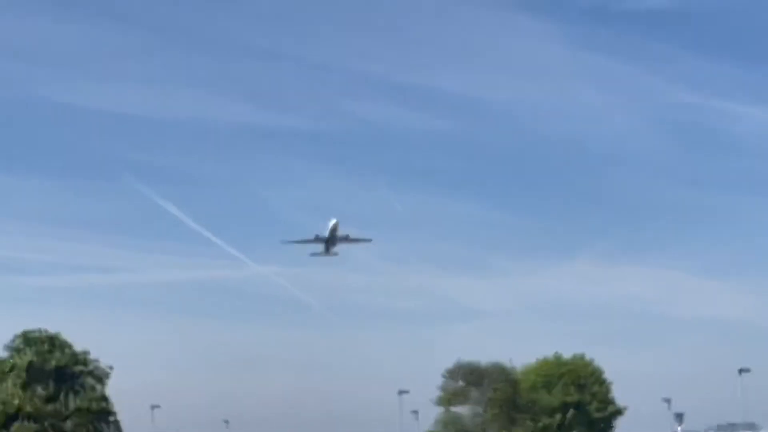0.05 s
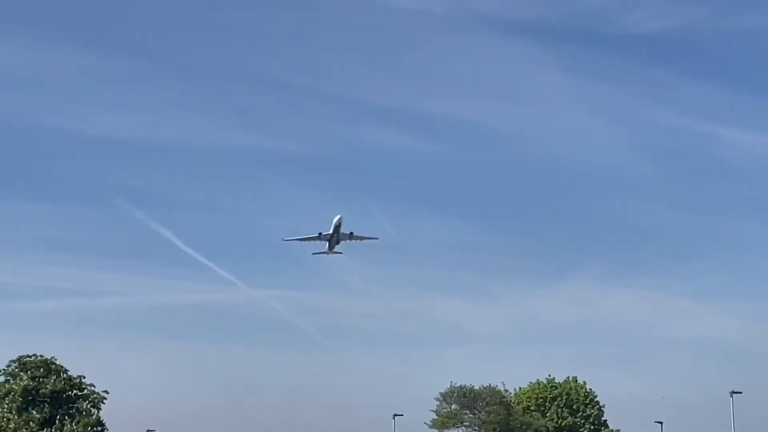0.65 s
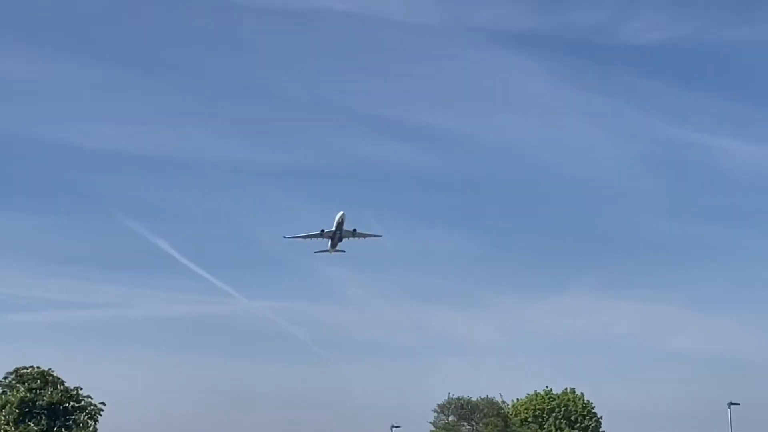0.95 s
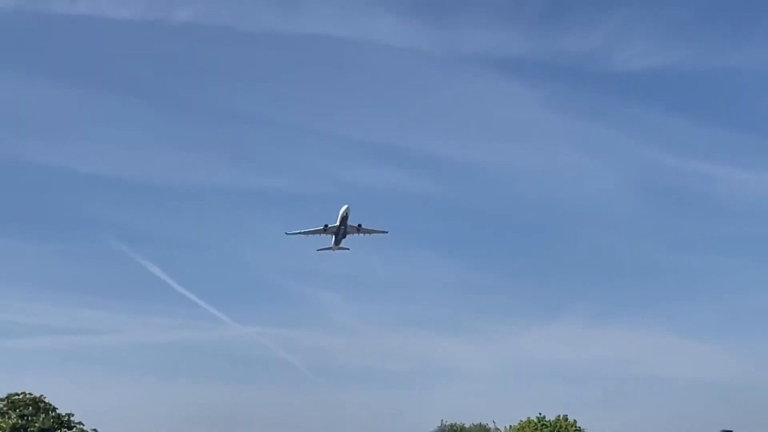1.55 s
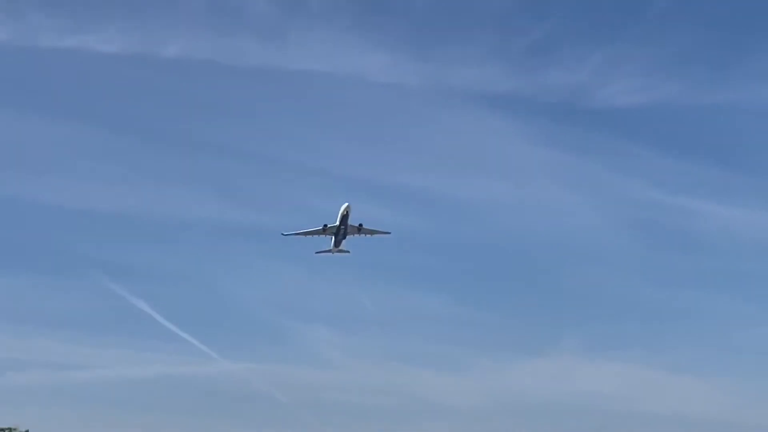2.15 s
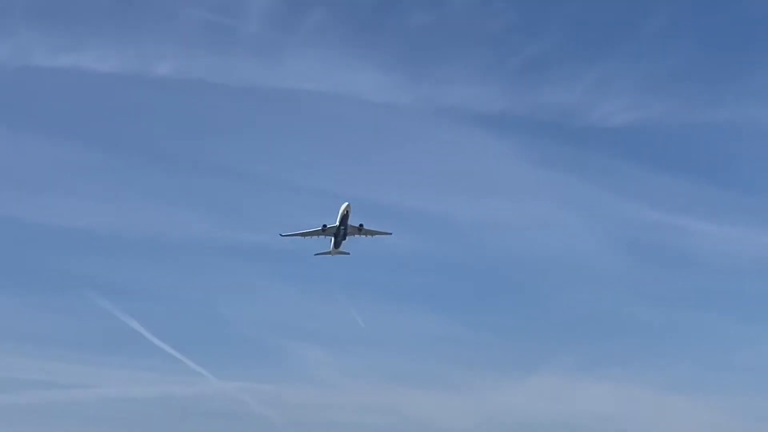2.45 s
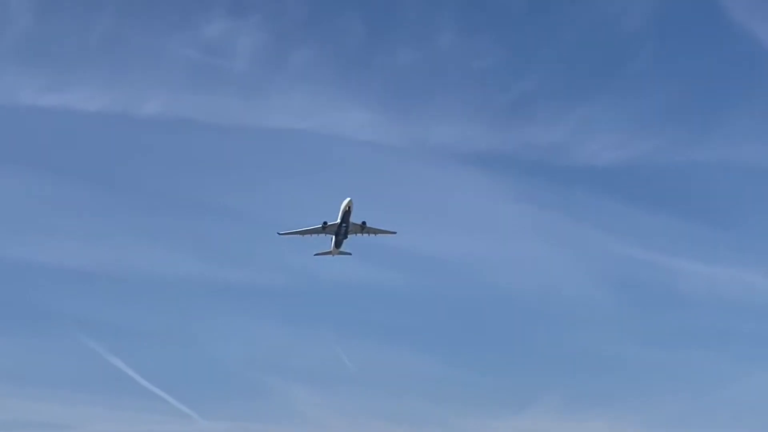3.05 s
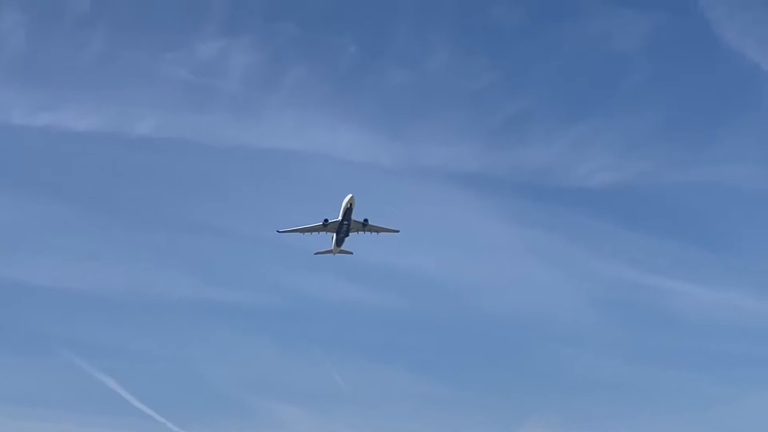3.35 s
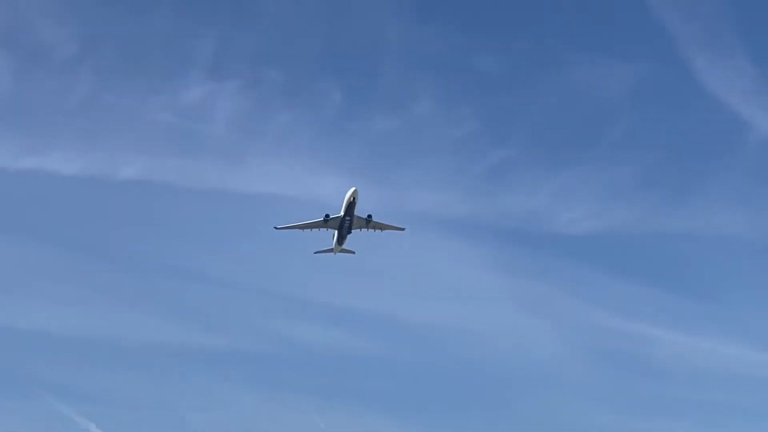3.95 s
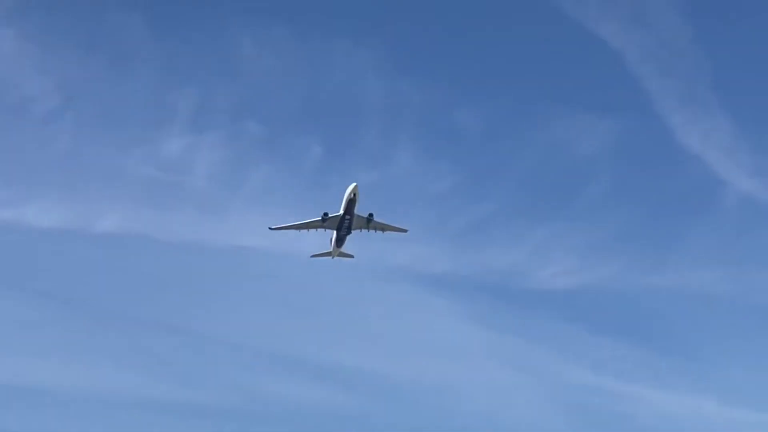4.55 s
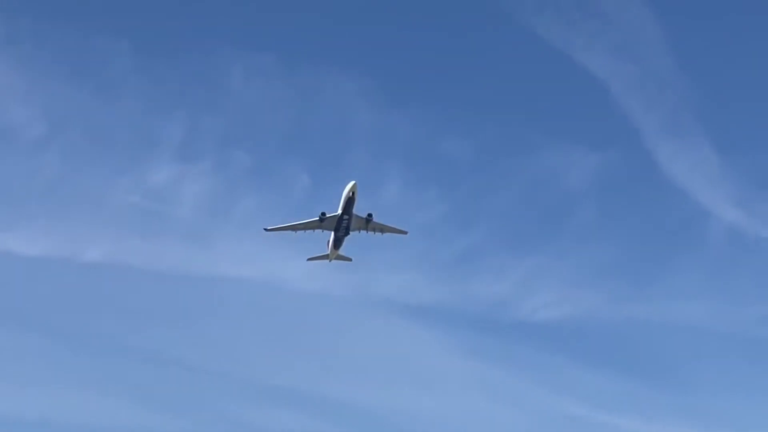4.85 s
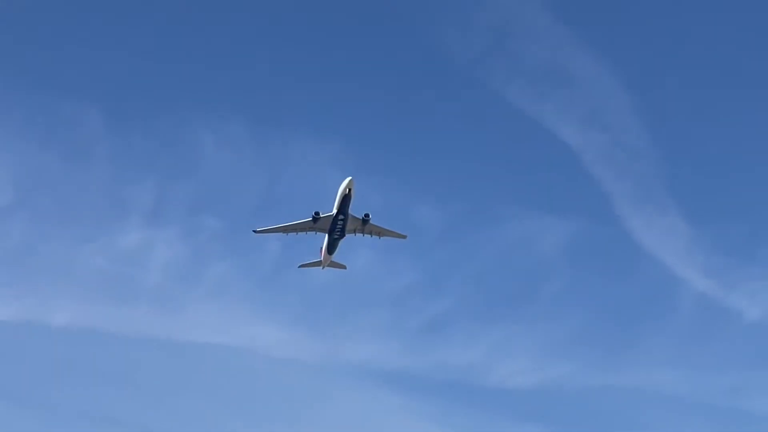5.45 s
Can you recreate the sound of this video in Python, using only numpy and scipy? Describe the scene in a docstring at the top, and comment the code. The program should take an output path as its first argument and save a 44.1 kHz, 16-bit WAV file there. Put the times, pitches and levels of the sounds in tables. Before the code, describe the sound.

A twin-engine airliner climbs towards the listener at takeoff power. Its roar and deep rumble swell and fade unevenly, growing louder just past halfway. A high, flickering fan whine sinks slightly in pitch over hiss and a faint buzz. The stereo microphone stands on open grass, where a light breeze thumps against it and a few soft rustles sound close by, mostly early on.

```python
"""A twin-engine airliner at takeoff power, climbing out towards a stereo microphone on open grass.
Its jets rumble and roar; its fans whine at their blade rate over faint buzz-saw tones on the shaft
orders, the pitch sinking as the approach slows. Turbulent air on the way makes the sound swell and
fade, and the echo off the ground sweeps a comb down through the roar. Close by are a few soft rustles
and a light breeze that buffets the microphone, mostly in the first three seconds."""
import sys
import numpy as np
from scipy import signal
from scipy.fft import rfft, irfft
from scipy.io import wavfile
from scipy.ndimage import uniform_filter1d

SR = 44100
rng = np.random.default_rng(int(sys.argv[2]) if len(sys.argv) > 2 else 0)


def log_audio(samples):
    """Write samples as a 16-bit WAV file to the path given in sys.argv[1]."""
    # one column per channel
    frames = np.atleast_2d(samples).T
    # limit to full scale, then quantise
    limited = np.clip(frames, -1, 1)
    pcm = np.round(limited * 32767).astype(np.int16)
    wavfile.write(sys.argv[1], SR, pcm)


N = 242550
TIME = np.arange(N) / SR


# jet noise reaching the microphone through turbulent air: (time [s], roar [dB], rasp [dB])
JET_LEVELS = [(0.0, -31, -35.5), (0.09, -35, -38), (1.33, -28.5, -28), (1.41, -25.5, -24.5),
              (1.7, -24.5, -27.5), (1.96, -28, -28.5), (2.59, -29.5, -34), (2.76, -30.5, -30.5),
              (2.9, -24.5, -29.5), (3.14, -16, -20), (3.45, -22.5, -24), (3.72, -26.5, -29.5),
              (3.92, -22, -23), (4.15, -25, -26), (4.46, -21, -28), (4.66, -23, -24), (4.93, -27, -28.5),
              (5.3, -27.5, -25.5), (5.5, -30.5, -26)]
# spectra of the roar and of the rasp above it: (frequency [Hz], level [dB])
ROAR_SPECTRUM = [(230, -27), (400, 5), (550, 3), (680, 3.5), (820, 0.5), (980, -9.5), (1400, -33)]
RASP_SPECTRUM = [(550, -30.5), (830, -0.5), (1000, 3), (1200, 1.5), (1500, -1), (1750, -5), (1900, -12),
                 (2080, -17), (2250, -18.5), (2450, -18.5), (3200, -32.5), (4500, -62)]

def jet_roar(roar_trim_db=-0.65, rasp_trim_db=-0.53):
    """Small eddies in the plume roar; the smallest, nearest the nozzles, rasp."""
    roar_db, rasp_db = in_time(JET_LEVELS)
    flutter_db = 0.18 * drift(23)
    roar = steadied(over_ground(noise(ROAR_SPECTRUM)), span_s=0.23)
    rasp = steadied(over_ground(noise(RASP_SPECTRUM)), span_s=0.65)
    roar *= from_db(roar_db + roar_trim_db + flutter_db)
    rasp *= from_db(rasp_db + rasp_trim_db + flutter_db)
    return roar + rasp


def roar_swing_db():
    """How far the roar stands above or below its mean level."""
    roar_db = in_time(JET_LEVELS)[0]
    return roar_db - roar_db.mean()


# spectrum of the deep rumble: (frequency [Hz], level [dB])
RUMBLE_SPECTRUM = [(20, -41.5), (31, -23.5), (42, -16), (57, -0.5), (68, -2.5), (81, 1), (105, -5.5),
                   (135, -8), (190, -29.5), (350, -20)]
# its surges and lulls: (time [s], level change [dB])
RUMBLE_SURGES = [(.06, -0.5), (0.132, 0), (.37, -3), (.51, 4.5), (.59, -4), (0.769, 6), (.84, -2),
                 (1.019, 5.5), (1.12, -15), (1.44, 4), (1.67, 3), (1.73, -9), (2.13, -18), (2.53, -7),
                 (2.66, 4), (2.93, 4.5), (3.0, -3), (3.065, 10), (3.15, -1.5), (3.28, 5), (3.39, 4.5),
                 (4.24, -25), (4.55, 4), (5.08, 3), (5.43, 4)]

def jet_rumble(far_db=-21, near_db=-20, surge_s=0.017):
    """The largest eddies, far down the plume, rumble in surges."""
    surge_db = sum(db * bell(s, surge_s) for s, db in RUMBLE_SURGES)
    level_db = on_approach(far_db, near_db) + 0.26 * roar_swing_db() + surge_db + 0.5 * drift(6.6)
    return from_db(level_db) * steadied(over_ground(noise(RUMBLE_SPECTRUM)), span_s=0.037)


# spectrum of the plume between rumble and roar: (frequency [Hz], level [dB])
BODY_SPECTRUM = [(90, -14), (135, -7), (175, -2), (215, -1.5), (280, 0), (350, -0.5), (430, -12),
                 (650, -31)]

def jet_body(far_db=-27.5, near_db=-19.5):
    """Mid-sized eddies fill out the roar as the aircraft closes on the microphone."""
    level_db = on_approach(far_db, near_db) + 0.59 * roar_swing_db() + 0.92 * drift(6.7)
    plume = approaching(noise(BODY_SPECTRUM), far_edge_hz=408)
    # long waves sink into the soft soil, so their echo comes back later
    return from_db(level_db) * steadied(over_ground(plume, soil_ms=0.27), span_s=0.13)


# bands of the roar that well up: (time [s], width [s], centre [Hz], level [dB])
ROAR_SWELLS = [(.76, 0.098, 1450, -38.5), (1.332, 0.11, 306, -29), (3.13, 0.14, 524, -25),
               (3.65, 0.12, 241, -24.5), (4.217, 0.22, 886, -28)]
# shape of one band, from lower skirt to upper skirt: (level [dB])
SWELL_BAND = (-25.5, -6, 0, -7.5, -27)

def roar_swells(skirt_octaves=0.6):
    """Bands of the roar swell briefly and fade."""
    ratios = 2 ** (skirt_octaves * np.array([-1, -0.5, 0, 0.64, 0.96]))
    return sum(from_db(db) * bell(s, width) * noise(list(zip(hz * ratios, SWELL_BAND)))
               for s, width, hz, db in ROAR_SWELLS)


# fan pitch as heard from the ground, its Doppler shift shrinking: (time [s], blade rate [Hz])
BLADE_RATE = [(0, 2336), (1.3, 2332), (2.1, 2322), (2.7, 2330), (3.0, 2320), (3.8, 2314), (4.2, 2303),
              (4.75, 2300), (5.5, 2281)]
BLADES = 34

def shaft_angle(waver_hz=1.51):
    """The fan's turning as heard from afar; eddies stretch and squeeze the path, so the pitch wavers."""
    blade_hz = in_time(BLADE_RATE)[0] + waver_hz * drift(4.88)
    return 2 * np.pi * np.cumsum(blade_hz) / SR / BLADES


# moments when eddies focus the whine on the microphone: (time [s], width [s], level [dB])
WHINE_PEAKS = [(.7, .017, -39.5), (.775, .022, -43), (.92, .02, -46), (1.045, .022, -39.5),
               (1.21, .016, -43), (1.34, .042, -38.5), (1.56, .02, -40), (1.7, .034, -39),
               (1.81, .018, -44), (1.92, .024, -42), (2.0, .02, -42.5), (2.155, .025, -38),
               (2.375, .013, -43), (2.585, .014, -44), (2.715, .026, -40), (2.825, .023, -38.5),
               (2.945, .024, -34), (3.005, .014, -29), (3.092, .026, -28), (3.19, .028, -35),
               (3.28, .032, -35.5), (3.38, .03, -38.5), (3.55, .028, -37.5), (3.65, .012, -40),
               (3.765, .03, -29), (3.85, .026, -31), (3.96, .03, -36), (4.06, .016, -38),
               (4.175, .024, -32.5), (4.25, .014, -36), (4.305, .013, -34.5), (4.428, .025, -28.5),
               (4.5, .014, -31), (4.555, .012, -38), (4.655, .032, -31.5), (4.8, .025, -40.5),
               (4.885, .014, -37), (4.99, .024, -34.5), (5.075, .032, -36.5), (5.22, .033, -29.5),
               (5.315, .021, -33.5), (5.41, .018, -39.5)]

def fan_whine(shaft, far_db=-49, near_db=-41.5, jitter_rad=0.4, pan_db=1.56):
    """The passing blades whine, a little to the left: rounded swells with a faint flicker between."""
    blade_phase = BLADES * shaft
    swell_gain = swells(WHINE_PEAKS) * from_db(1.5 * drift(22))
    swelling = swell_gain * scattered(blade_phase + jitter_rad * drift(16), share=0.04, rate_hz=24)
    flickering = from_db(on_approach(far_db, near_db)) * scattered(blade_phase, share=0.66, rate_hz=36)
    return (swelling + flickering) * from_db([[pan_db], [-pan_db]])


# buzz-saw tones, riding on the level of the jet's rasp: (shaft order, relative level [dB])
BUZZ_TONES = [(9, -12), (15, -24), (19, -16.5), (20, -21), (21, -18.5), (22, -19.5), (23, -16.5), (24, -22),
              (25, -23), (26, -23.5), (31, -30.5), (32, -27), (42, -37.5), (45, -43), (49, -41)]
# single tones that well up: (time [s], width [s], shaft order, level [dB])
BUZZ_PEAKS = [(.7, .08, 19, -39), (1.41, .045, 8, -31), (2.93, .04, 8, -26), (2.95, .12, 31, -44),
              (3.18, .08, 8, -29), (3.72, .07, 24, -37), (3.84, .06, 32, -43), (3.86, .08, 42, -48),
              (5.3, .2, 27, -42)]

def buzz_saw(shaft, trim_db=0.5):
    """The blades' unequal shock waves repeat once a turn and sound on the shaft orders."""
    rasp_db = in_time(JET_LEVELS)[1]
    buzz = sum(from_db(db) * scattered(order * shaft, share=0.79, rate_hz=6.7)
               for order, db in BUZZ_TONES)
    peaks = sum(from_db(db) * bell(s, width) * scattered(order * shaft, share=0.4, rate_hz=22)
                for s, width, order, db in BUZZ_PEAKS)
    return from_db(rasp_db + trim_db) * buzz + peaks


# fan inlet noise at the microphone: (time [s], band near the blade rate [dB], hiss [dB])
INLET_LEVELS = [(0.03, -64, -55), (0.65, -52, -51), (0.71, -35, -50), (0.78, -56, -46.5),
                (0.85, -49, -45.5), (1.33, -41, -50), (1.36, -34.5, -44.5), (2.61, -61, -49.5),
                (3.0, -37, -41), (3.71, -36.5, -45), (3.8, -38.5, -39.5), (4.32, -44.5, -43.5),
                (4.35, -45, -44), (4.44, -42.5, -43), (4.5, -44, -39), (5.04, -39.5, -44.5),
                (5.25, -37.5, -40.5), (5.45, -42, -42.5)]
# spectra of the broad hiss and of the rough band just under the blade rate: (frequency [Hz], level [dB])
HISS_SPECTRUM = [(1400, -31.5), (2100, 8), (2450, 1), (2700, 1), (2950, 2.5), (3400, -1), (3800, -6),
                 (4300, -18.5), (5200, -36), (7000, -51)]
TIP_SPECTRUM = [(1900, -24.5), (2020, 4.5), (2140, -0.5), (2270, 0.5), (2380, -31)]

def fan_hiss(hiss_trim_db=3, tip_trim_db=-3.5):
    """Turbulence on the blades hisses; the air swallows less of its top as the distance shrinks."""
    tip_db, hiss_db = in_time(INLET_LEVELS)
    hiss = steadied(approaching(noise(HISS_SPECTRUM), far_edge_hz=2300), span_s=0.44)
    return from_db(hiss_db + hiss_trim_db) * hiss + from_db(tip_db + tip_trim_db) * noise(TIP_SPECTRUM)


def fan_drone(shaft, order=8, above_inlet_db=2):
    """One low shaft order drones, rising and falling with the inlet noise."""
    inlet_db = np.mean(in_time(INLET_LEVELS), axis=0)
    return from_db(inlet_db + above_inlet_db) * scattered(order * shaft, share=0.15, rate_hz=6.3)


# the bounce off the grass, later as the aircraft rises: (time [s], lag [ms], level [dB])
GROUND_ECHO = [(0, 0.9, -15), (.9, 0.95, -8), (1.5, 1.15, -20), (2.85, 1.48, -8), (3.2, 1.65, -15),
               (3.6, 1.9, -9), (3.9, 2.08, -8), (4.35, 2.25, -8), (4.85, 2.95, -4), (5.2, 3.38, -3),
               (5.5, 3.7, -5)]

def over_ground(direct, soil_ms=0, grass_hz=750):
    """Add the ground echo at the microphone: late by the extra path, dulled by the grass."""
    lag_ms, echo_db = in_time(GROUND_ECHO)
    echo_time = TIME - (lag_ms + soil_ms) / 1000
    dulled = low_pass(direct, grass_hz, order=1)
    echo = np.array([np.interp(echo_time, TIME, channel) for channel in dulled])
    return direct + from_db(echo_db) * echo


# spectrum of the roar coming back from around the field: (frequency [Hz], level [dB])
SURROUND_SPECTRUM = [(120, 0), (300, 2.5), (550, -1), (750, 1), (1000, -5.5), (1500, -6.5), (1780, 0),
                     (2050, -13.5), (2400, -18), (2900, -53)]

def surrounding_roar(far_db=-34.5, near_db=-29):
    """Roar scattered by trees and buildings reaches the microphone from all sides."""
    level_db = on_approach(far_db, near_db) + 0.33 * roar_swing_db()
    return from_db(level_db) * rms_one(over_ground(noise(SURROUND_SPECTRUM, diffuse=True)))


# gusts on the microphone: (time [s], width [s], level [dB])
MIC_GUSTS = [(.55, 0.12, -26.5), (1.0, 0.083, -40), (1.2, 0.087, -34.5), (2.0, 0.17, -31),
             (2.47, 0.03, -36), (3.1, 0.3, -39.5)]
# spectrum of the buffeting: (frequency [Hz], level [dB])
WIND_SPECTRUM = [(20, -15), (45, -10), (80, 6), (130, 5), (200, -8), (320, -16), (600, -27.5), (1200, -48)]

def breeze(start_db=-35, end_db=-47.5):
    """A dying breeze buffets each microphone port on its own."""
    strength = from_db(on_approach(start_db, end_db)) + swells(MIC_GUSTS)
    lumps_db = 5 * np.clip([drift(23), drift(28)], -2, 2)
    return strength * rms_one(noise(WIND_SPECTRUM, diffuse=True) * from_db(lumps_db))


# short puffs of wind on the microphone: (time [s], width [s], level [dB])
MIC_PUFFS = [(.507, .009, -21), (.615, .007, -23), (.74, .02, -25), (1.21, .01, -12), (1.245, .01, -20),
             (1.38, .025, -21), (1.45, .012, -19), (1.55, .02, -21), (1.89, .03, -22), (2.295, .012, -16),
             (2.555, .006, -21), (3.375, .012, -17)]
# spectrum of their thump: (frequency [Hz], level [dB])
PUFF_SPECTRUM = [(45, -18), (90, 6), (230, 0.5), (320, -13.5), (500, -23), (800, -36.5)]

def puffs():
    """Small eddies thump on both microphone ports at once."""
    return swells(MIC_PUFFS) * steadied(noise(PUFF_SPECTRUM), span_s=0.018)


# rustles close by: (time [s], width [s], level [dB], upper edge [Hz])
CLOSE_RUSTLES = [(.107, .009, -43.5, 11000), (.282, .017, -48, 12000), (.325, .008, -57, 12000),
                 (2.468, .022, -49, 3900)]
# spectrum of their swish: (frequency [Hz], level [dB])
RUSTLE_SPECTRUM = [(1800, -8), (3300, 6), (5200, -2), (7200, -8), (8500, -29), (11000, -9), (13000, -28)]

def rustles():
    """Short soft swishes next to the microphone, some crisp, some dull."""
    swish = noise(RUSTLE_SPECTRUM) * from_db(2 * drift(150))
    return sum(from_db(db) * bell(s, width) * low_pass(swish, edge_hz, order=4)
               for s, width, db, edge_hz in CLOSE_RUSTLES)


# spectrum of the field's background hiss: (frequency [Hz], level [dB])
AIR_SPECTRUM = [(100, -7.5), (3000, 6), (4600, 0.5), (5500, -4), (6400, -6), (7400, -12.5), (8200, -27.5),
                (10000, -13), (12000, -15.5), (13000, -27)]

def open_air(start_db=-54, end_db=-56.5):
    """A faint outdoor hiss lies behind everything."""
    return from_db(on_approach(start_db, end_db)) * noise(AIR_SPECTRUM)


# stereo width at the microphone: (frequency [Hz], side over mid [dB])
STEREO_WIDTH = [(30, -30), (250, -31.5), (1000, -21), (2300, -13.5), (3000, -26.5), (5000, -46), (7000, 1),
                (9500, 6.5), (12000, -17)]

def noise(spectrum, diffuse=False):
    """Stereo noise of rms 1, nearly alike in both channels below the high treble unless diffuse."""
    hz = np.arange(N // 2 + 1) * SR / N
    mid, side = rfft(rng.standard_normal((2, N)))
    if not diffuse:
        side = side * from_db(at_hz(STEREO_WIDTH, hz))
    channels = np.array([mid + side, mid - side])
    skirt = 1 / (1 + (hz / spectrum[-1][0]) ** 4)
    return rms_one(irfft(channels * from_db(at_hz(spectrum, hz)) * skirt, N))


def scattered(phase, share, rate_hz):
    """A tone heard through eddies: a steady part plus a share of wandering strength and phase; rms 1."""
    wander = (drift(rate_hz) + 1j * drift(rate_hz)) / np.sqrt(2)
    amplitude = np.sqrt(1 - share) + np.sqrt(share) * wander
    return rms_one(np.real(amplitude * np.exp(1j * phase)))


def approaching(near, far_edge_hz):
    """A sound that is dull from afar and opens up as the aircraft nears."""
    far = signal.sosfiltfilt(signal.butter(2, far_edge_hz, fs=SR, output="sos"), near)
    return on_approach(far, near)


def on_approach(far, near):
    """Move ever faster from the value with the aircraft far off to the one with it nearly overhead."""
    return far + (near - far) * (TIME / TIME[-1]) ** 2


def drift(rate_hz):
    """Smooth chance of spread 1 that changes about rate_hz times a second."""
    hop, run_in = 40, 2000
    pole = np.exp(-2 * np.pi * rate_hz * hop / SR)
    draws = rng.standard_normal(N // hop + run_in + 2)
    slow = signal.lfilter([1], [1, -2 * pole, pole * pole], draws)[run_in:]
    return np.interp(np.arange(N) / hop, np.arange(len(slow)), rms_one(slow))


def bell(s, width_s):
    """A smooth rise and fall of height 1 around a moment."""
    return np.exp(-0.5 * ((TIME - s) / width_s) ** 2)


def swells(rows):
    """Gain of a row of bell-shaped swells."""
    return sum(from_db(db) * bell(s, width) for s, width, db in rows)


def steadied(x, span_s):
    """Even out the power of a noise over a short span."""
    power = uniform_filter1d(np.mean(x ** 2, axis=0), int(span_s * SR))
    return x / np.sqrt(power + 1e-12)


def low_pass(x, edge_hz, order):
    """Butterworth low-pass."""
    return signal.sosfilt(signal.butter(order, edge_hz, fs=SR, output="sos"), x)


def in_time(rows):
    """Each column of a curve at every sample."""
    s, *columns = np.transpose(rows)
    return [np.interp(TIME, s, column) for column in columns]


def at_hz(points, hz):
    """Read a spectrum on a log-frequency axis."""
    point_hz, db = np.transpose(points)
    return np.interp(np.log(hz + 1), np.log(point_hz), db)


def from_db(db):
    """Decibels to gain."""
    return 10 ** (np.asarray(db) / 20)


def rms_one(x):
    """Scale to unit power."""
    return x / np.sqrt(np.mean(np.abs(x) ** 2) + 1e-20)


def scene():
    """The airliner in the distance, the breeze at the microphone and the open field around it."""
    jets = jet_roar() + jet_rumble() + jet_body() + roar_swells()
    shaft = shaft_angle()
    fans = fan_whine(shaft) + buzz_saw(shaft) + fan_hiss() + fan_drone(shaft)
    return jets + fans + surrounding_roar() + breeze() + puffs() + rustles() + open_air()


def record(dry, low_cut_hz=33, high_cut_hz=12400, ease_s=0.003):
    """The microphone drops the deepest bass; the top is cut and the ends are eased."""
    heard = signal.sosfilt(signal.butter(5, low_cut_hz, "high", fs=SR, output="sos"), dry)
    ease = np.clip(np.minimum(TIME, TIME[-1] - TIME) / ease_s, 0, 1)
    return signal.sosfilt(signal.ellip(10, 0.1, 80, high_cut_hz, fs=SR, output="sos"), heard * ease)


dry = scene()
out = record(dry)
log_audio(out)
```